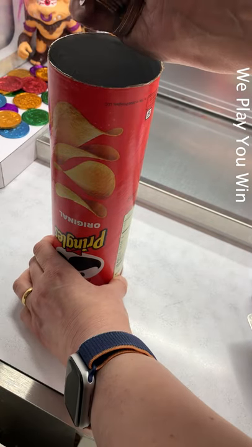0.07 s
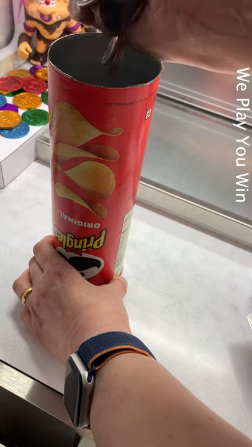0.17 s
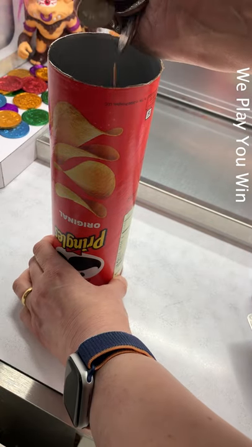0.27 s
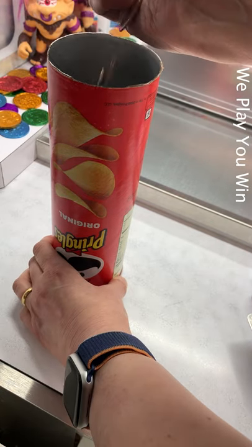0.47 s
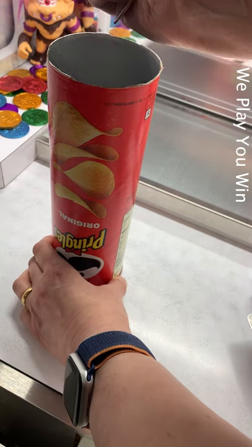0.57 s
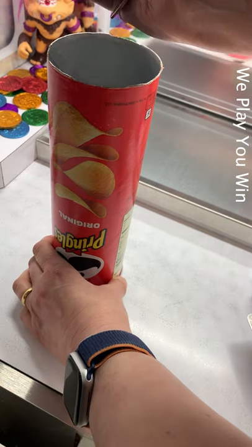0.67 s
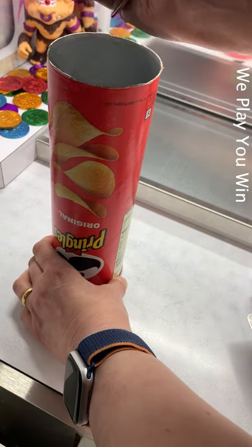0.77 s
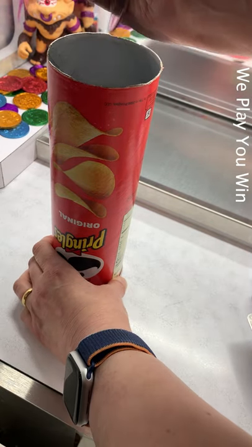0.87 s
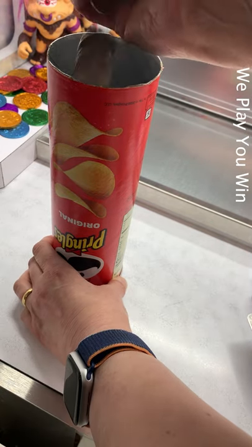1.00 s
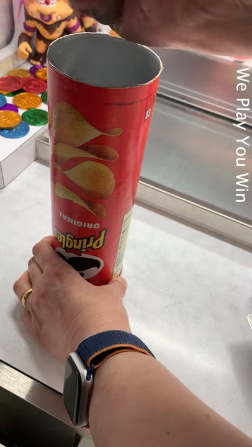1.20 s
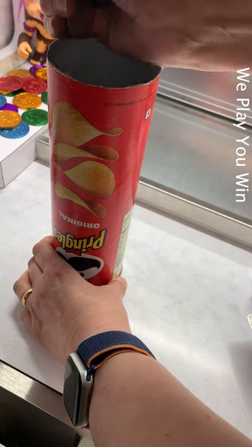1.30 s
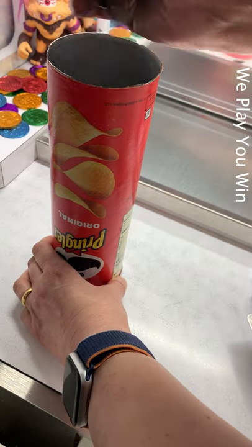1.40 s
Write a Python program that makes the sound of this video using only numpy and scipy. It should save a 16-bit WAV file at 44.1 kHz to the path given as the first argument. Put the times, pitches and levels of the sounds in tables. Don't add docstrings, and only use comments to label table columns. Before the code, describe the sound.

Close-up indoors, a handful of metal coins slides and jingles brightly into a hollow can, swelling until a sudden cut; after a short pause more coins land in separate, damped knocks, with low thumps on the counter.

```python
import sys
import numpy as np
from scipy import signal
from scipy.fft import rfft, irfft
from scipy.io import wavfile

SR = 44100
rng = np.random.default_rng(int(sys.argv[2]) if len(sys.argv) > 2 else 0)


def gain_from_db(level_db):
    decades = np.asarray(level_db, float) / 20
    return 10 ** decades


def generate_wav(sig):
    pcm = np.round(np.clip(np.atleast_2d(sig).T, -1, 1) * 32767).astype(np.int16)
    wavfile.write(sys.argv[1], SR, pcm)


N = 63945

# f/Hz, density/dB
EARLY_ROOM_TONE = [(15, -59.5), (25, 0), (221, -3), (271, -4), (936, -16), (2240, -19), (6000, -32.5),
                   (7800, -64.5), (13200, -120)]
LATE_ROOM_TONE = [(35, -57.5), (60, -20.5), (563, -25.5), (716, -20), (862, -23), (1020, -35), (5000, -53),
                  (6500, -77.5), (11000, -120)]
# f/Hz, level/dB
EARLY_HUM = [(276.6, -61.5), (553, -70)]
LATE_HUM = [(673, -75), (1530, -73.5), (1074, -78)]
# t/s, peak/dB, t60/s, colour f/Hz
TICKS = [(.0218, -45, 0.022, 3570), (.058, -52, .04, 3500), (.0643, -38, 0.059, 4030),
         (.0645, -44, 0.09, 9500), (.111, -40, 0.067, 3920), (.132, -27.5, 0.064, 8900),
         (.1565, -27, 0.026, 6600), (.181, -31, 0.032, 8000), (.1981, -17, .054, 10400),
         (.2288, -14, 0.027, 10400), (.2428, -21, 0.075, 4670), (.252, -10.5, 0.067, 9300),
         (.2688, -14, 0.033, 12000), (.302, -23, .05, 2400), (.3182, -16, 0.025, 2380)]
# t/s, level/dB
SLIDE_LEVEL = [
    (.05, -80),
    (.1, -67),
    (.14, -44.5),
    (.195, -40.5),
    (.235, -33.5),
    (.3, -35),
    (.38, -32),
    (.58, -30),
    (.62, -27),
    (.79, -24.5),
]
# f/Hz, density/dB
SLIDE_TONE = [(710, -59.5), (1200, -5.5), (1700, -12), (1850, -11), (2350, -8.5), (2730, -10.5), (4960, -3),
              (8530, -10.5), (16000, -1.5)]
# f/Hz, width/Hz, level/dB
PALM_MODES = [(2300, 220, 4.6)]
# t/s, level/dB
THUMPS = [(.19, -16), (.45, -8), (.52, -6), (0.656, 20), (.75, -12.5), (0.985, -12), (1.083, -1),
          (1.149, 0.5), (1.234, -7), (1.361, -16)]
# t/s, level/dB
RING_LEVEL = [
    (.22, -18.5),
    (.252, -12.5),
    (.34, -17.5),
    (.4, -14.5),
    (.6, -17),
    (.785, -10),
]
# t/s, peak/dB
CHIMES = [(0.2533, -12.5), (0.2722, -15.5), (0.3176, -12), (0.3709, -7.5), (0.3824, -12), (0.4249, -7),
          (0.463, -4), (0.478, -8), (0.5075, -9), (0.5227, -6), (0.5519, -6), (0.605, -1.5), (0.6199, -8),
          (0.6448, -3.5), (0.656, -5.5), (0.683, -4), (0.7171, -6.5), (0.7557, -23.5)]
# centre f/Hz, spread over coins/Hz, level/dB, t60/s
COIN_MODES = [(15110, 183, 2, 0.096), (8860, 77.4, -10.5, 0.18), (9240, 65, -9, 0.059),
              (9870, 700, -4.5, 0.032)]
# t/s, level/dB
FILL_LEVEL = [
    (.338, -42.5),
    (.395, -35),
    (.41, -27.5),
    (.56, -27.5),
    (.785, -30),
]
# t/s, peak/dB, t60/s, colour f/Hz, thud/dB
LANDINGS = [(.3395, -9.5, 0.015, 2560, 10), (.3665, -11.5, 0.05, 2600, 2), (.4003, 1.5, 0.014, 2740, -10),
            (.406, -4.5, 0.033, 2230, 3.5), (.424, -7.5, 0.042, 3020, 2.5), (.4335, -1, .035, 4500, -9),
            (.442, -1.5, 0.074, 4440, 9), (.447, -13, .03, 4760, 9), (.468, -11, 0.06, 3000, 11),
            (.4845, -11, 0.034, 3050, -14), (.4872, -1, 0.054, 2930, 1.5), (.5052, -7, 0.013, 1970, 7),
            (.519, -6, 0.016, 3500, -0.5), (.5235, -3, 0.098, 2270, 3.5), (.542, -4.5, 0.063, 3400, -18.5),
            (.5535, -9.5, 0.024, 3040, 6.5), (.5575, -1, 0.06, 3460, -2.5), (.5865, -7, 0.015, 4000, -10),
            (.5892, -3, 0.067, 3020, 2), (.604, -8.5, 0.073, 4070, -5.5), (.628, -3, 0.046, 4000, -6),
            (.634, -9.5, 0.029, 5070, -12), (.6455, -7, 0.083, 2900, -2), (.66, -8.5, 0.067, 3950, 3.5),
            (.678, -4.5, 0.078, 2520, -10), (.6835, -7, 0.024, 2200, -15), (.712, -11, 0.047, 3000, -11),
            (.7235, -8.5, .03, 5500, 1.5), (.735, -16, 0.037, 4970, 1.5), (.7635, -6.5, 0.021, 3020, 3),
            (.776, -5.5, 0.026, 5170, -1), (.786, -9, 0.027, 5200, -6.5)]
# f/Hz, density/dB
LAND_TONE = [(35, -73.5), (60, -14.5), (225, -5.5), (294, -16.5), (415, -9), (637, -5), (750, 0),
             (2930, -4), (7800, -9), (10100, -96), (17200, -120)]
# f/Hz, width/Hz, level/dB
EMPTY_CAN_MODES = [(113.6, 6.4, 4.5), (149.7, 2.4, 5), (246, 38, -4), (402.8, 39, 8.5), (564, 13, 1.5),
                   (1001, 77, -8.5), (1640, 490, -11.5), (2922, 20, -7), (3427, 24, -5.5),
                   (4780, 160, -10.5)]
FULL_CAN_MODES = [(271, 24, -1), (396.4, 11, -4.5), (594, 32, -3.5), (1013, 112, 7.5), (1370, 23, -4.5),
                  (3600, 33, -4.5), (3955, 61, -5), (7400, 110, -30)]
# t/s, level/dB
TUMBLE_LEVEL = [(.79, -26), (.842, -32), (.858, -44.5), (.89, -76.5), (.938, -99), (.95, -65.5),
                (.965, -50.5), (.978, -48), (.985, -26.5), (1.03, -24.5), (1.048, -28), (1.135, -23),
                (1.19, -28.5), (1.228, -32), (1.32, -26.5), (1.352, -61.5), (1.362, -32), (1.415, -25.5),
                (1.45, -43)]
# t/s, peak/dB, t60/s, colour f/Hz, thud/dB
BLOWS = [(.7992, -16, 0.022, 5000, 4.5), (.8254, -18, 0.056, 6020, -3.5),
         (.9414, -32.5, 0.032, 9100, -40.5), (.9812, -9.5, 0.016, 4200, 3.5), (1.005, -22, 0.066, 4000, 9),
         (1.0358, -10.5, .025, 2250, 2), (1.062, -9, 0.054, 2600, 0), (1.0717, -11.5, 0.017, 7050, -13),
         (1.0735, -7, 0.075, 3650, 4.5), (1.088, -8, 0.045, 2480, 5), (1.0905, -6, 0.033, 6500, 0),
         (1.1, -17, .03, 5000, 3), (1.1225, -21, .03, 7400, -22), (1.129, -17, 0.023, 6000, -17),
         (1.1378, -9, 0.05, 2800, 4), (1.172, -13, 0.062, 2720, -8), (1.177, -11.5, 0.05, 4870, 1),
         (1.188, -13, 0.018, 4470, 1.5), (1.2062, -16, 0.04, 7400, 2), (1.2336, -6.5, 0.023, 3930, 5),
         (1.24, -11, 0.061, 3420, -2.5), (1.2758, -15.5, 0.015, 2560, -4), (1.284, -13.5, 0.019, 3570, -1),
         (1.3025, -15.5, 0.068, 3800, 3), (1.3585, -10, 0.07, 4540, 3.5), (1.3885, -15, .02, 8400, 6.5),
         (1.3983, -40, 0.047, 4500, 0), (1.437, -39, .03, 4000, -14)]
# f/Hz, density/dB
PILE_TONE = [(59, -58.5), (100, -23), (266, -8.5), (570, -1.5), (736, -13.5), (1060, -8.5), (1610, -3),
             (2900, -8.5), (3700, -9.5), (13500, -4), (16000, -7.5)]

CHANGE_S, CHANGE_FADE_S = .792, .0011
EARLY_ROOM_DB, LATE_ROOM_DB, HUM_DB = -59, -61, 2.
SLIDE_DB, FILL_DB, CLATTER_LOW_DB = 5, 1, -6.5
TICK_DB, LANDING_DB, BLOW_DB = -17.5, -20., -19
CONTACT_T60_S, CLUMP_HZ, CLUMP_DB = .012, 39, 1.5
SNAP_DB, CRACK_T60_S, LONGEST_T60_S = 2., .0075, .055
TINT_DB, TINT_Q = 7.5, 1.73
THUD_DB, THUD_RISE_S, THUD_T60_S, THUD_SPLIT_HZ = 9.5, .0048, .052, 1400
STRIKES_PER_S, STRIKE_CLUMP_DB = 150., 2.
CHIME_DB, CHIME_SHARE, CHIME_SPREAD_S = -12., .47, .005
CAN_DB = 10.5


def rms_one(x):
    return x / np.sqrt(np.mean(x ** 2) + 1e-20)


def cut(x, hz, kind, order=2):
    sos = signal.butter(order, hz, kind, fs=SR, output="sos")
    return signal.sosfilt(sos, x + 1e-18)


def gain_curve(rows):
    s, db = np.transpose(rows)
    return gain_from_db(np.interp(np.arange(N) / SR, [s[0] - .01, *s], [-110, *db]))


def drift(hz):
    r = np.exp(-2 * np.pi * hz / SR)
    wander = signal.lfilter([1], [1, -2 * r, r * r], rng.standard_normal(N + 4000))
    return rms_one(wander[4000:])


def colour(x, tone, modes=(), modes_db=0.):
    hz = np.maximum(np.arange(4097) * SR / 8192, 10)
    points = np.array([(10, -60), *tone, (SR / 2, tone[-1][1] - 30)])
    gain = gain_from_db(np.interp(np.log(hz), np.log(points[:, 0]), points[:, 1]))
    boost = 1
    for f, width_hz, db in modes:
        boost = boost + gain_from_db(db + modes_db) / np.sqrt(1 + np.abs(2 * (hz - f) / width_hz) ** 3)
    cepstrum = irfft(np.log(gain * boost))
    cepstrum[1:4096] *= 2
    cepstrum[4097:] = 0
    kernel = irfft(np.exp(rfft(cepstrum)))
    return signal.fftconvolve(x, kernel / np.sqrt(np.sum(kernel ** 2)))[:N]


def contacts(per_s, uneven_db):
    born = rng.random(N) < per_s / SR
    power = born * gain_from_db(uneven_db * np.minimum(rng.exponential(1, N), 4)) ** 2
    decay = gain_from_db(-120 / (CONTACT_T60_S * SR))
    env = np.sqrt(signal.lfilter([1], [1, -decay], power) + 1e-6)
    clumps = gain_from_db(CLUMP_DB * drift(CLUMP_HZ))
    return rms_one(env * clumps * rng.standard_normal(N))


def hits(rows, crack_db, hold_s):
    sharp, thud = np.zeros((2, N + SR))
    t = np.arange(SR // 4) / SR
    swell = (1 - np.exp(-t / THUD_RISE_S)) * gain_from_db(-60 * t / THUD_T60_S)
    for s, db, t60_s, hz, *thud_db in rows:
        i = int(s * SR)
        noise = rng.standard_normal(len(t))
        noise[:64] = rms_one(noise[:64])
        rattle = gain_from_db(-60 * np.maximum(t - hold_s, 0) / np.clip(t60_s, .005, LONGEST_T60_S))
        crack = gain_from_db(crack_db - 60 * t / CRACK_T60_S)
        hit = noise * (rattle + crack)
        hit[0] += gain_from_db(SNAP_DB + crack_db)
        tint = signal.lfilter(*signal.iirpeak(hz, TINT_Q, fs=SR), hit)
        sharp[i:i + len(t)] += gain_from_db(db) * (hit + gain_from_db(TINT_DB) * tint)
        thud[i:i + len(t)] += gain_from_db(db + sum(thud_db) + THUD_DB) * noise * swell
    return sharp[:N], thud[:N]


def join_bands(sharp, thud):
    return cut(sharp, THUD_SPLIT_HZ, "high") + cut(thud, THUD_SPLIT_HZ, "low")


def before_change():
    return np.clip((CHANGE_S - np.arange(N) / SR) / CHANGE_FADE_S, 0, 1)


def room(tone, level_db, hum):
    t = np.arange(N) / SR
    lines = np.zeros(N)
    for hz, db in hum:
        lines += gain_from_db(db + HUM_DB + 1.5 * drift(8.)) * np.sin(2 * np.pi * hz * t)
    return gain_from_db(level_db) * colour(rng.standard_normal(N), tone) + lines


def palm():
    slide = gain_from_db(SLIDE_DB) * gain_curve(SLIDE_LEVEL) * contacts(per_s=2200., uneven_db=2.5)
    ticks, _ = hits(TICKS, crack_db=-6., hold_s=.0056)
    coins = slide * before_change() + gain_from_db(TICK_DB) * ticks
    return colour(cut(coins, 1950, "high", order=3), SLIDE_TONE, PALM_MODES)


def thumps():
    s, db = np.transpose(THUMPS)
    push = np.zeros(N)
    push[(s * SR).astype(int)] = gain_from_db(db)
    return cut(cut(push, 111, "low"), 41., "high")


def coin_ring(count=20):
    out = np.zeros(N)
    drive = gain_curve(RING_LEVEL) * gain_from_db(STRIKE_CLUMP_DB * drift(30.)) / 10
    s, knock_db = np.transpose(CHIMES)
    for detune in np.clip(rng.standard_normal((count, len(COIN_MODES))), -2, 2):
        struck = (rng.random(N) < STRIKES_PER_S / SR) * rng.standard_normal(N) * drive
        share, size, late = rng.random((3, len(s)))
        at = ((s + CHIME_SPREAD_S * late) * SR).astype(int)
        struck[at] += gain_from_db(knock_db + CHIME_DB) * (share < CHIME_SHARE) * (size + .2)
        for (hz, spread_hz, db, t60_s), d in zip(COIN_MODES, detune):
            r = gain_from_db(-60 / (t60_s * SR))
            w = 2 * np.pi * (hz + spread_hz * d) / SR
            resonator = [0, gain_from_db(db) * np.sin(w)], [1, -2 * r * np.cos(w), r * r]
            out += signal.lfilter(*resonator, struck + 1e-18)
    return cut(out, 5100., "high", order=4)


def landings():
    fill = gain_from_db(FILL_DB) * gain_curve(FILL_LEVEL) * contacts(per_s=700., uneven_db=-.5)
    struck = gain_from_db(LANDING_DB) * join_bands(*hits(LANDINGS, crack_db=1.5, hold_s=.002))
    return colour(fill + struck, LAND_TONE, EMPTY_CAN_MODES, CAN_DB)


def second_handful():
    clatter = gain_curve(TUMBLE_LEVEL) * contacts(per_s=4300., uneven_db=2.)
    sharp, thud = hits(BLOWS, crack_db=8., hold_s=.0015)
    low = gain_from_db(CLATTER_LOW_DB) * cut(clatter, 180., "high")
    pile = join_bands(clatter + gain_from_db(BLOW_DB) * sharp, low + gain_from_db(BLOW_DB) * thud)
    return colour(pile, PILE_TONE, FULL_CAN_MODES, CAN_DB)


def scene():
    early = room(EARLY_ROOM_TONE, EARLY_ROOM_DB, EARLY_HUM) + coin_ring() + landings()
    late = cut(room(LATE_ROOM_TONE, LATE_ROOM_DB, LATE_HUM), 110., "high", order=4)
    background = before_change() * (early - late) + late
    return (background + palm() + thumps() + second_handful())[None]


def band_limit(x):
    return signal.sosfilt(signal.butter(12, 16820, fs=SR, output="sos"), x)


def record(dry):
    limit = .62
    rounded = limit * np.tanh(cut(dry, 42, "high") / limit)
    top_cut = signal.ellip(8, .5, 60, 15750, fs=SR, output="sos")
    mix = signal.sosfilt(top_cut, rounded)
    return band_limit(mix)


dry = scene()
out = record(dry)
generate_wav(out)
```